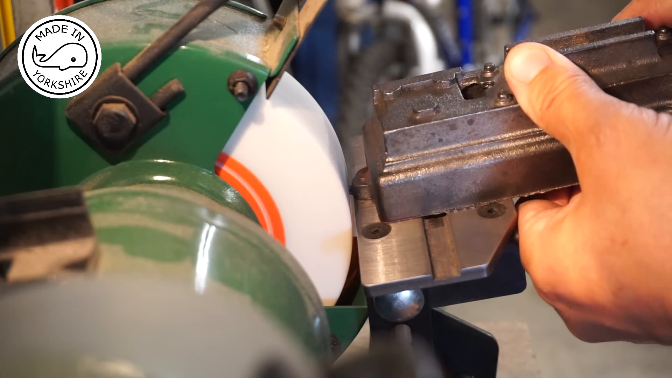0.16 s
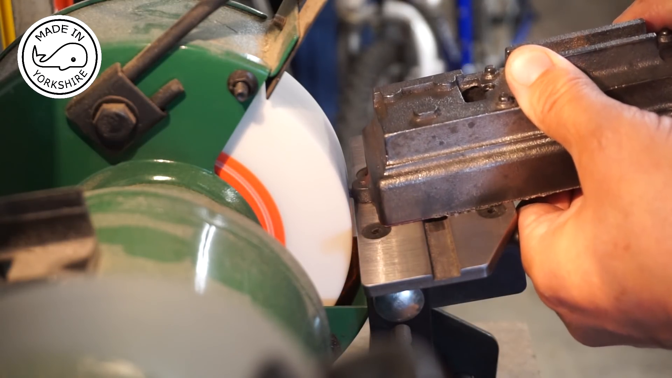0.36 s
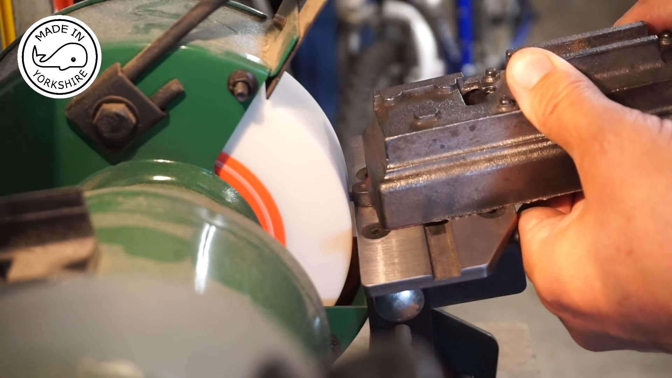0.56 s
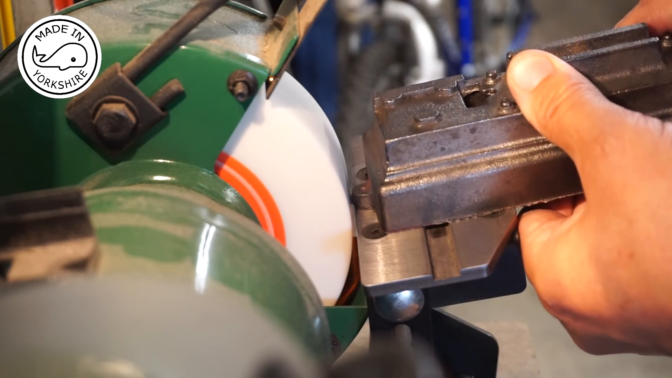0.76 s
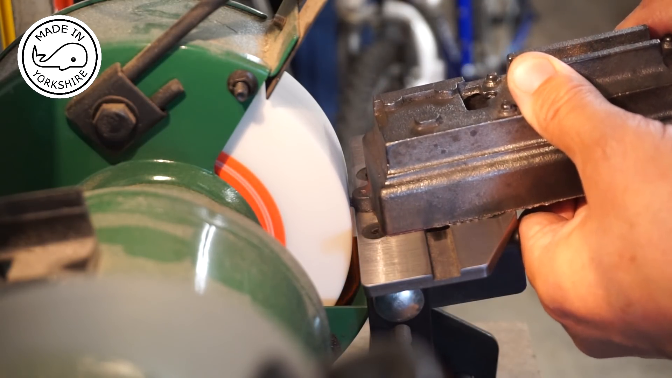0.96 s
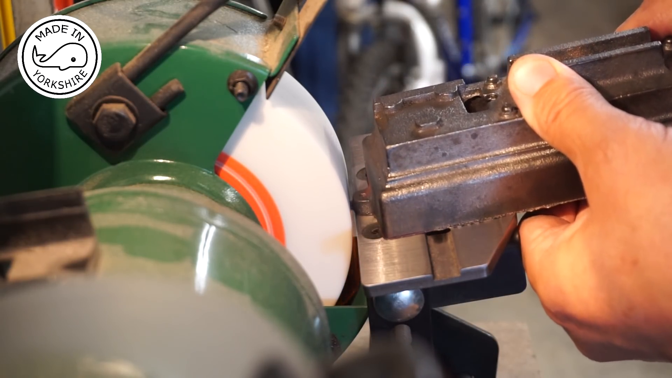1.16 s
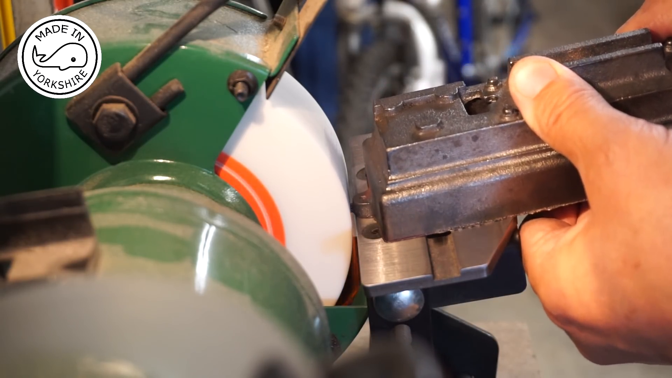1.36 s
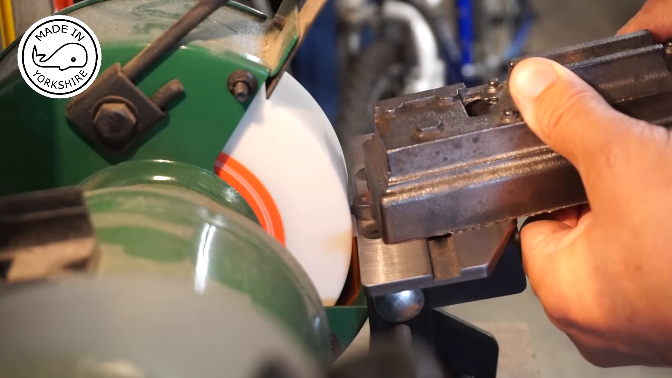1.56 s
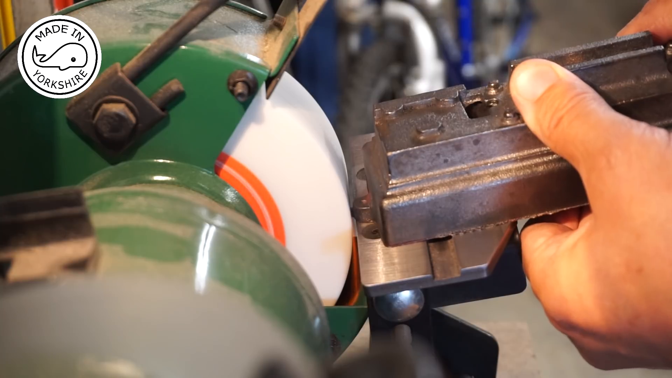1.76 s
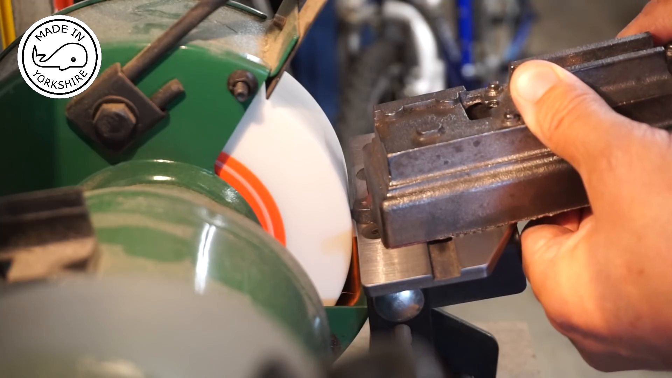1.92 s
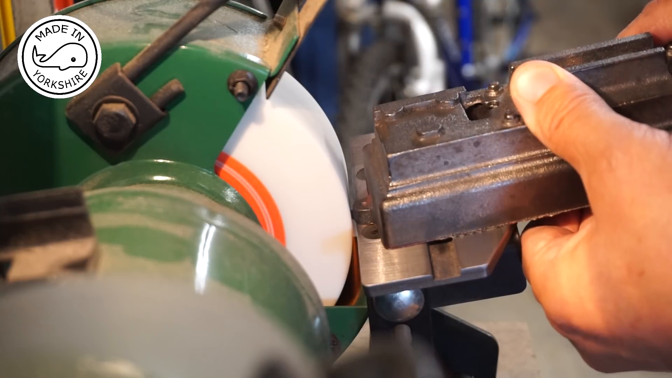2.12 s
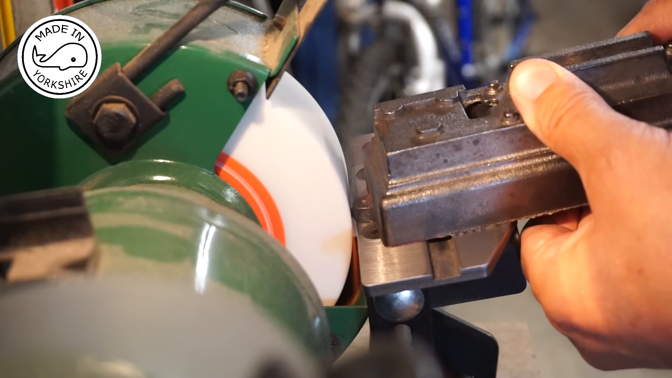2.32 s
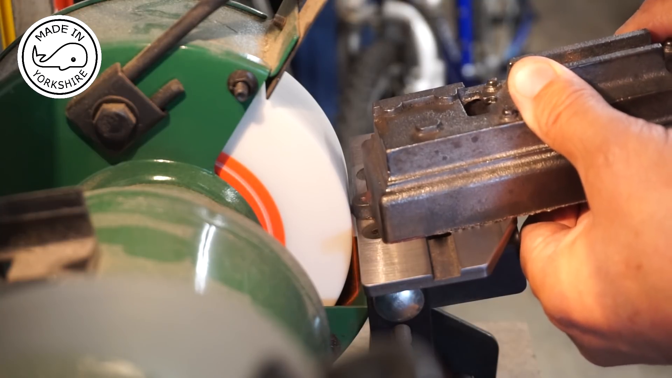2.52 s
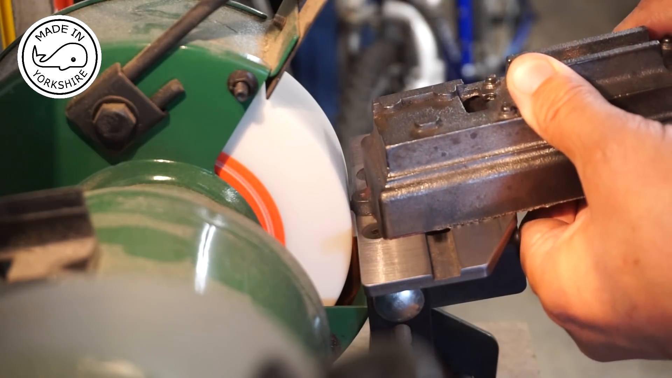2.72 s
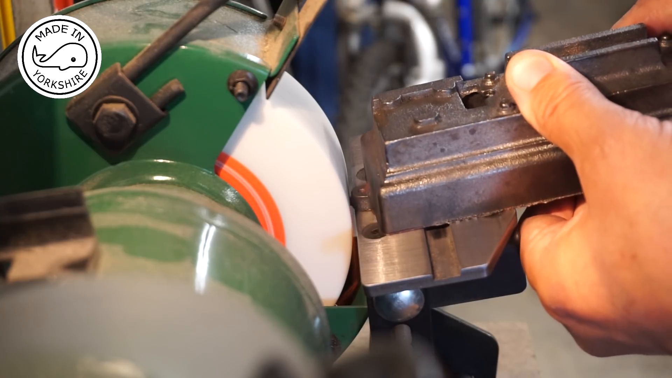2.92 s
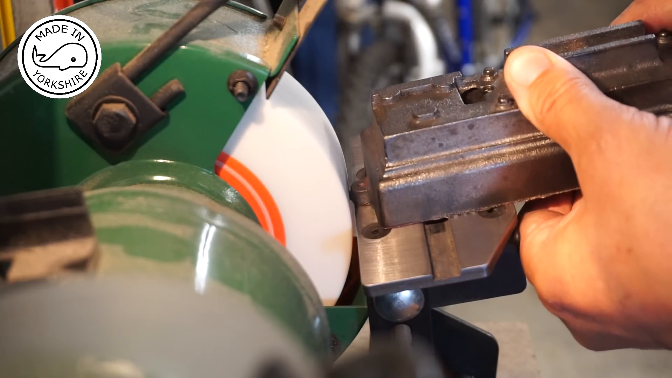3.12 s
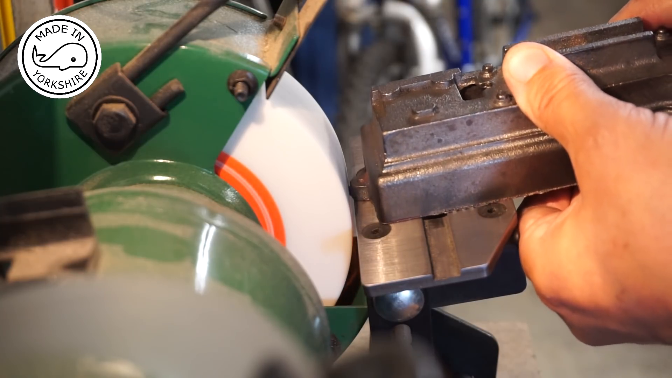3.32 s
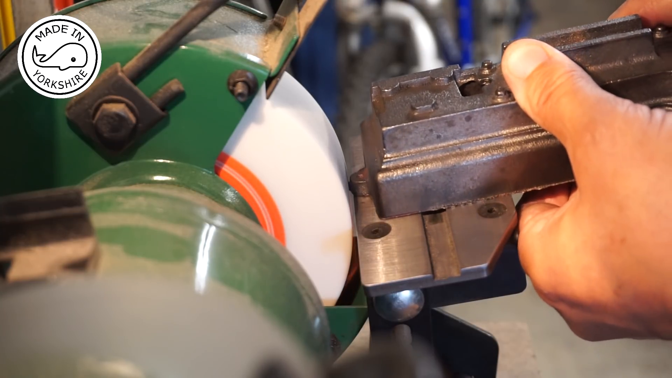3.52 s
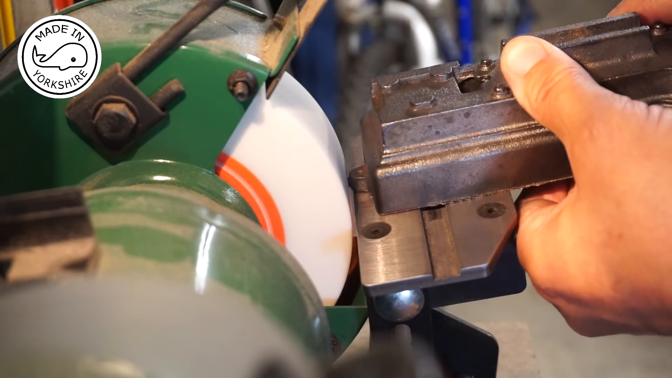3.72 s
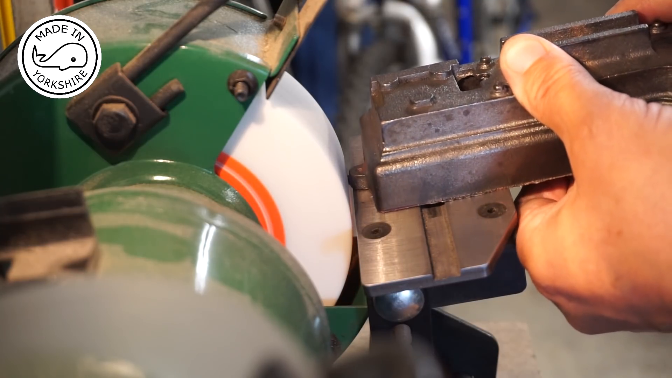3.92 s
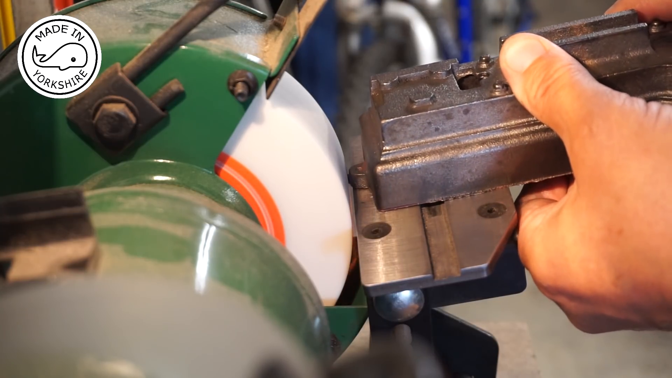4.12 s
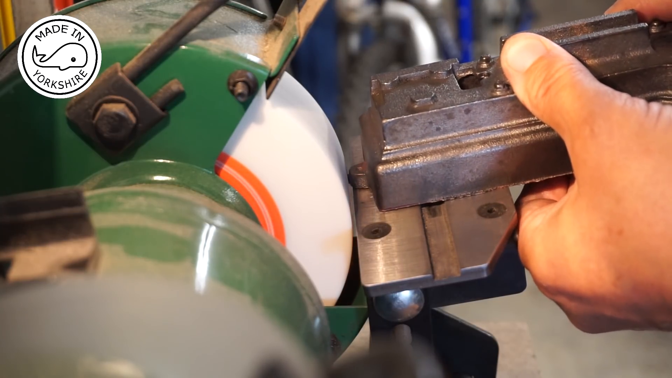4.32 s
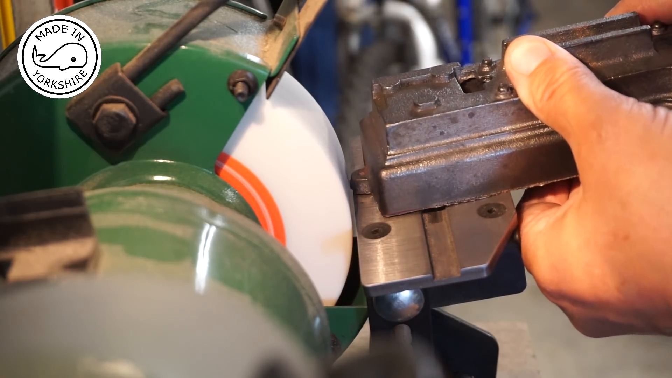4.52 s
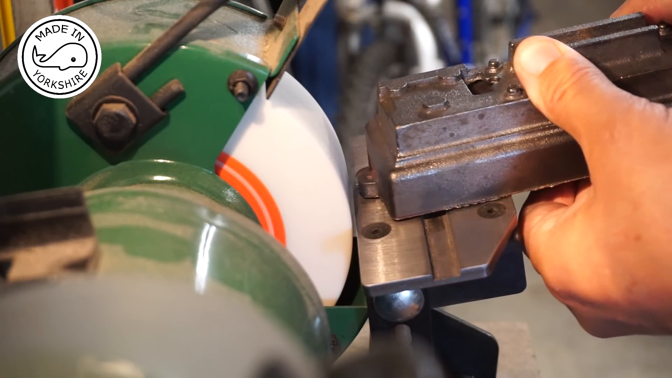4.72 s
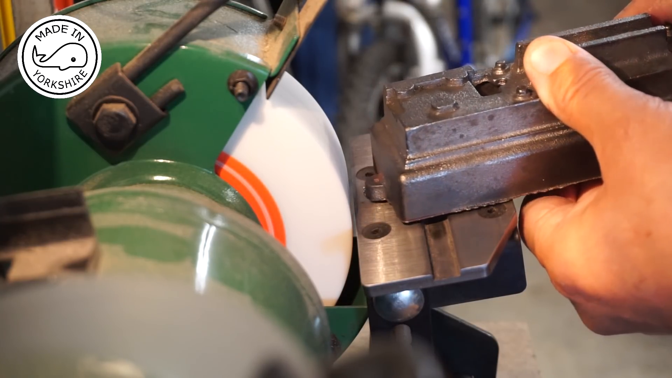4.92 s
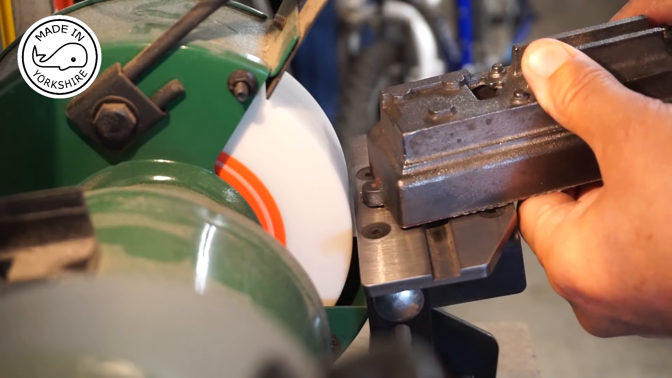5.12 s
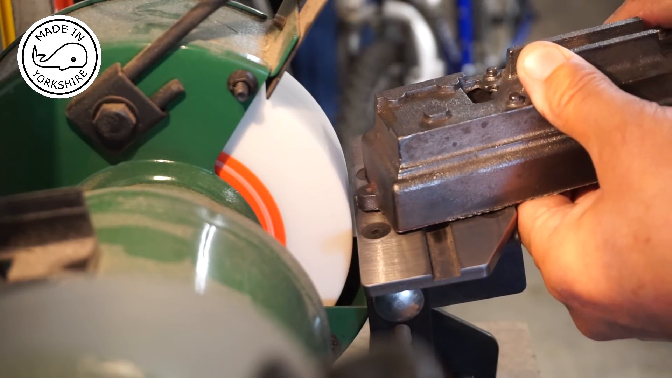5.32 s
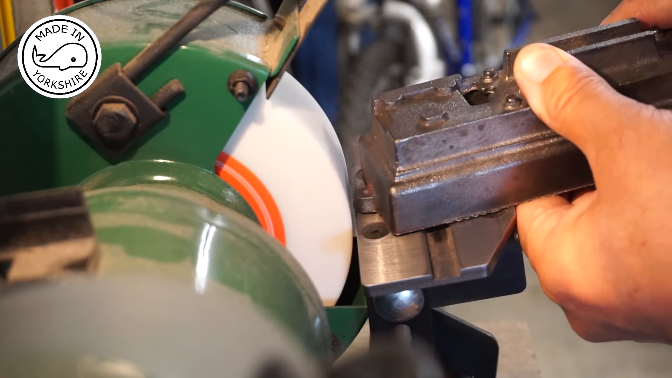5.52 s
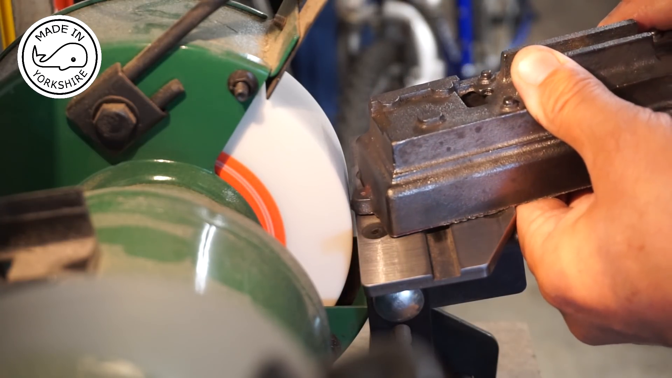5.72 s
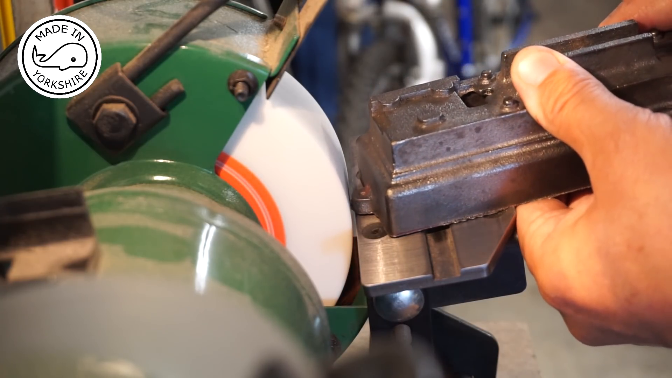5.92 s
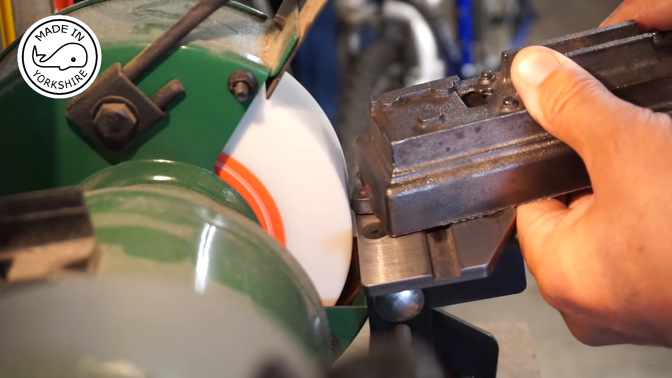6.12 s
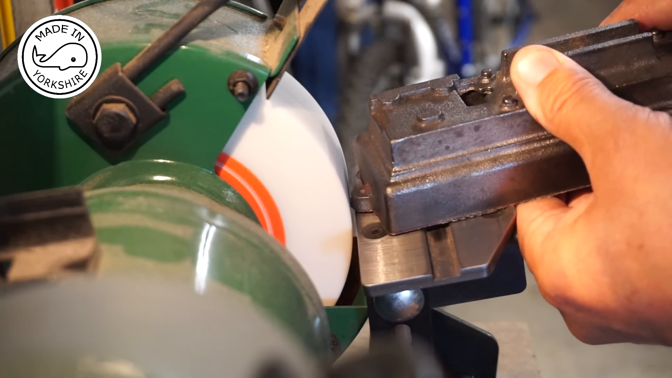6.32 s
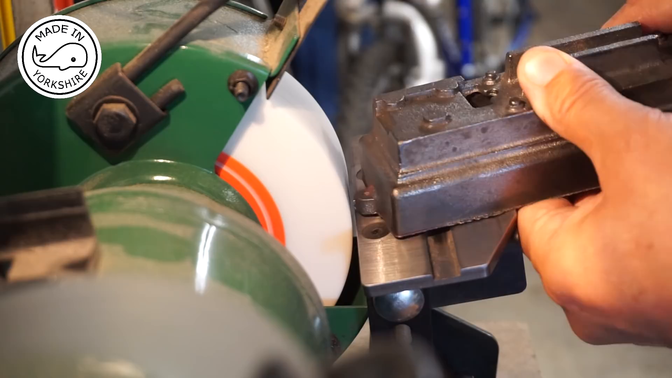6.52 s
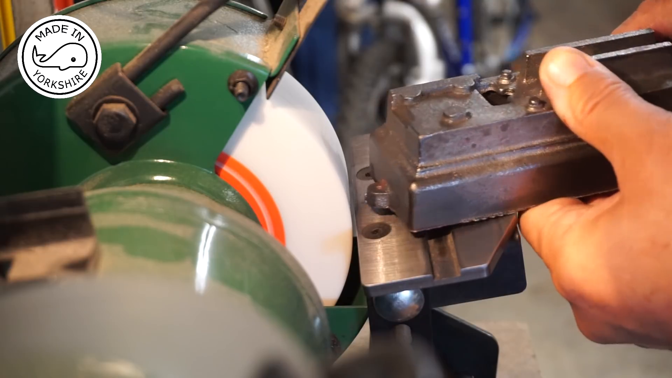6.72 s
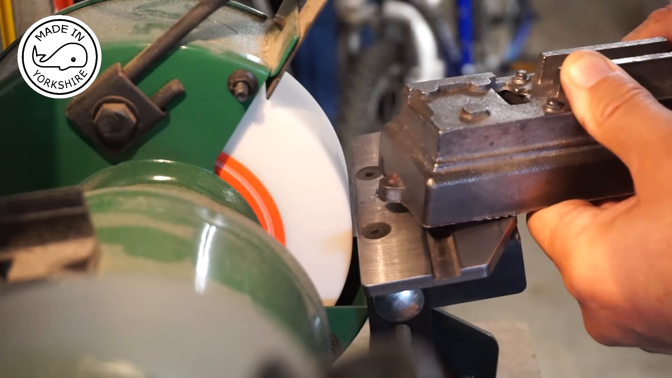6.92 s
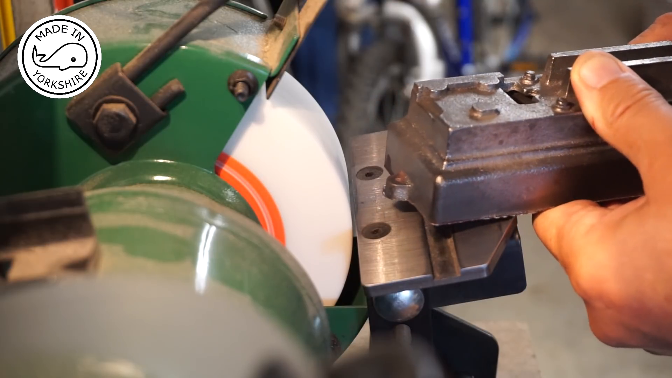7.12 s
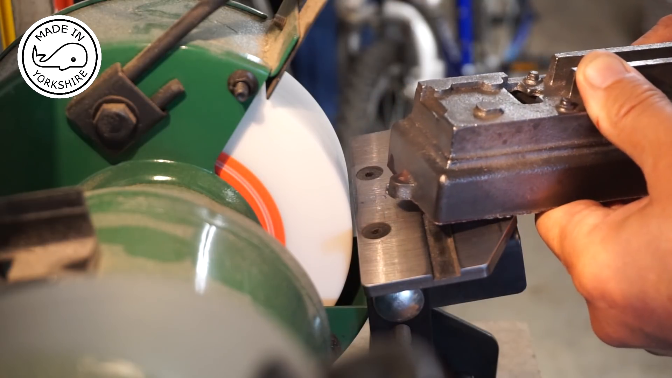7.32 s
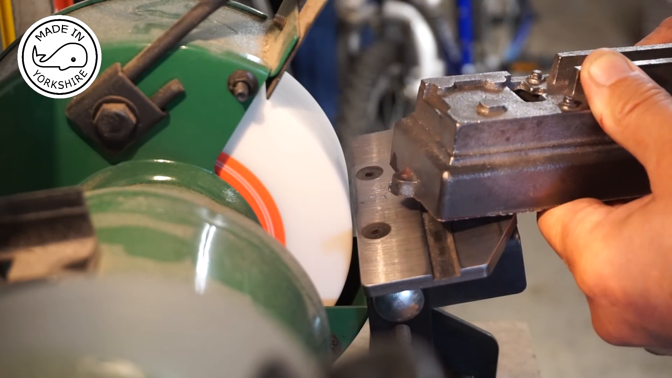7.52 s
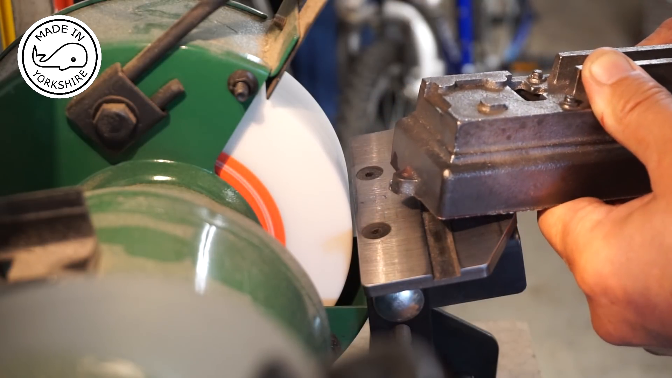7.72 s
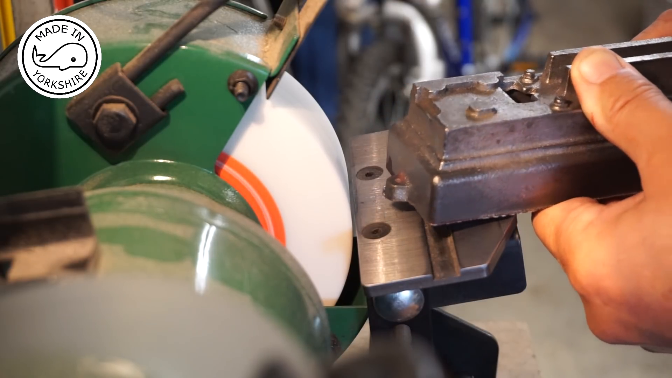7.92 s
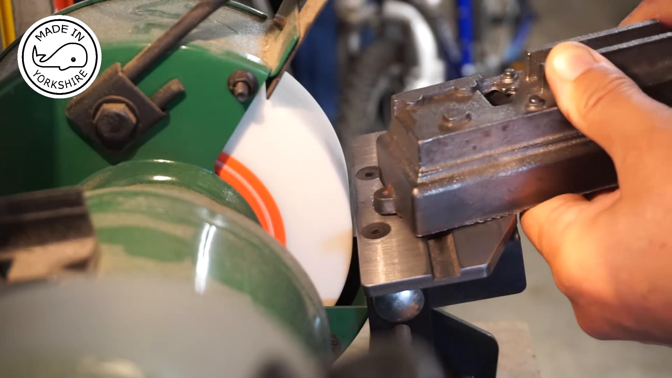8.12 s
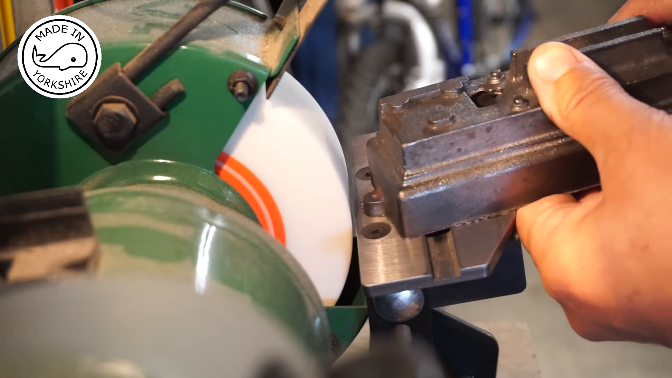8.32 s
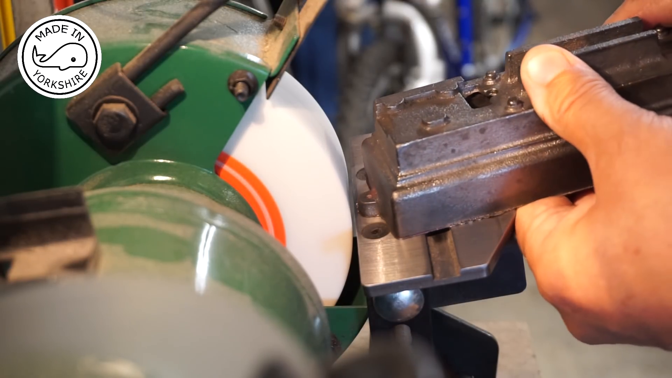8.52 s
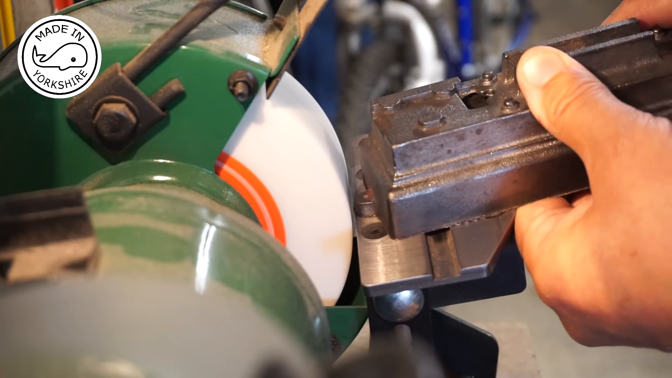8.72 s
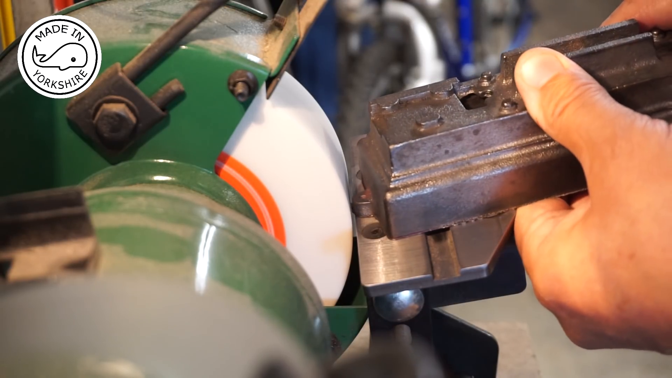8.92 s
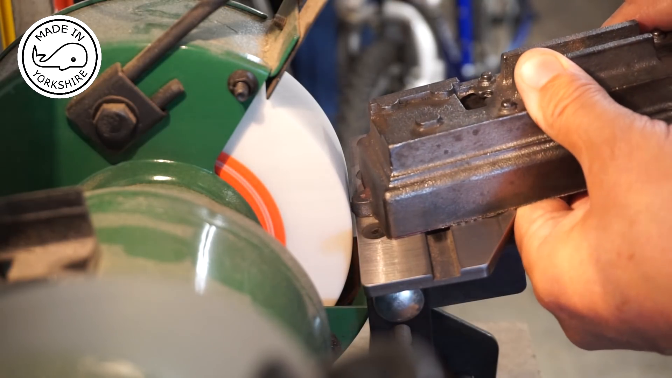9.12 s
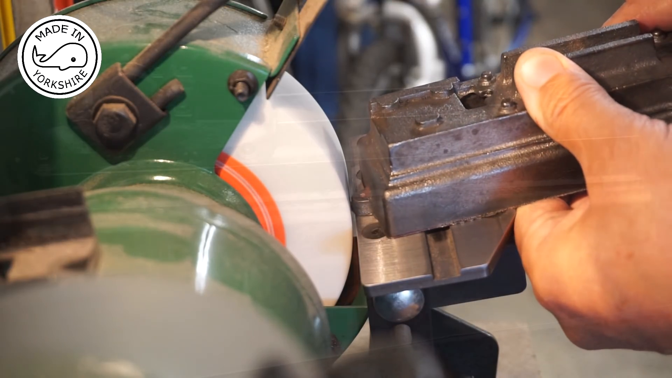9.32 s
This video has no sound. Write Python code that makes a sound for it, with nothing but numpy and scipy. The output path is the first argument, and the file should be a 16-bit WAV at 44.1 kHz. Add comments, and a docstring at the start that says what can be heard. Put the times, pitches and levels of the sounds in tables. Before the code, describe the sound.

From 0 to 4.3 seconds a steel casting is held against a bench grinder's wheel: a loud, dense, bright metallic hiss with many high ringing tones, over a hollow mid-low roar from the guard. It flutters fast, about fifty times a second, and wavers with hand pressure; faint dull thuds come through the bench. At 4.3 the casting stutters off in rapid skips. The much quieter free wheel hums, with airy rush and bearing whirr, while the casting buzzes on the tool rest until 5.25. Small knocks at 5.6 lead into a second, rougher stroke from 5.7 to 6.4. Then come scraping buzzes and light knocks, the loudest knock at 8.1 starting a strong buzz, with another short one near 8.45. At 9.0 a third bright, throbbing stroke bites in and continues to the end at about 9.5. Close stereo, short room echo.

```python
"""A steel casting is already being pressed on a bench grinder's wheel in a small workshop: grit rings the
casting and roars in the guard, throbbing with each turn, while the free wheel hums underneath and low thuds
come through the bench. At 4.3 s the casting skips off the wheel, then buzzes on the tool rest, hopping once a
turn. A short second stroke comes at 5.7 s, then more buzzing and knocks on the rest, the loudest at 8.1 s. A
third stroke starts at 9.0 s and is still going at the end; a short echo follows throughout."""
import sys
import numpy as np
from scipy import signal
from scipy.fft import rfft, irfft, next_fast_len
from scipy.io import wavfile
from scipy.ndimage import uniform_filter1d, map_coordinates

SR = 44100
rng = np.random.default_rng(int(sys.argv[2]) if len(sys.argv) > 2 else 0)


def transcribe(signal):
    """Save signal, clipped to [-1, 1], as a 16-bit WAV file at the path in sys.argv[1]."""
    frames = np.atleast_2d(signal).T
    limited = np.clip(frames, -1, 1)
    pcm = np.round(limited * 32767).astype(np.int16)
    wavfile.write(sys.argv[1], SR, pcm)


N = 412756  # length in samples


def amp(db):
    """Decibels become a plain gain."""
    return 10 ** (np.asarray(db) / 20)


def unit(x):
    """Scale a signal to an average (RMS) strength of 1."""
    return x / np.sqrt(np.mean(x ** 2) + 1e-20)


def along(points, hz):
    """Read a curve of (f/Hz, value) points on a log frequency axis."""
    f, value = np.transpose(points)
    return np.interp(np.log(hz + 1), np.log(f + 1), value)


def curves(rows):
    """One value per sample for each column after the time."""
    s, *columns = np.transpose(rows)
    return [np.interp(np.arange(N) / SR, s, column) for column in columns]


def wobble(rate):
    """A smooth random curve through rate random points a second."""
    knots = rng.standard_normal(int(N * rate / SR) + 4)
    fine = np.arange(0, len(knots) - 1, 1 / 10)
    return np.interp(np.arange(N) * rate / SR, fine, map_coordinates(knots, [fine]))


def filtered(x, response):
    """Multiply the spectrum of x by a response that depends on frequency."""
    size = next_fast_len(N + SR // 2)
    return irfft(rfft(x, size) * response(np.fft.rfftfreq(size, 1 / SR)), size)[..., :N]


def ring(x, modes, sharp=0.92, core=0.0, size=8192):
    """Shake a body that rings at its modes; core is the strength of each mode's long-ringing centre."""
    hz = np.fft.rfftfreq(size, 1 / SR)

    def peak(offset):
        return 1 / (1 + offset ** 2) ** 2

    power = 0
    for f, width, db in modes:
        offset = sharp * (hz - f) / width
        power = power + amp(db) ** 2 * (peak(offset) + core * peak(5 * offset))
    power = power * (1 - 1 / (1 + (hz / 200) ** 7))  # low cut: keep the bass out below about 200 Hz
    # fold the cepstrum so that the body answers only after it is struck
    cepstrum = irfft(np.log(power + 1e-12) / 2)
    cepstrum[1:size // 2] *= 2
    cepstrum[size // 2 + 1:] = 0
    answer = irfft(np.exp(rfft(cepstrum)))
    return signal.fftconvolve(x, answer / np.linalg.norm(answer))[:N]


def surface(turns, life, count):
    """A pattern of count bumps round the wheel that recurs each turn and wears away over life turns."""
    keep = np.exp(-1 / life)
    fresh = rng.standard_normal((int(turns[-1]) + 2, count))
    fresh[0] /= np.sqrt(1 - keep ** 2)  # the first turn is already fully rough
    worn = signal.lfilter([1], [1, -keep], fresh, axis=0)
    return unit(map_coordinates(worn.ravel(), [turns * count]))


def bursts(events, t60):
    """A short noisy scrape at each event, falling by 60 dB in t60 seconds."""
    out, t = np.zeros(N + SR), np.arange(SR // 4) / SR
    for s, db in events:
        out[round(s * SR):][:len(t)] += amp(db - 60 * t / t60) * rng.standard_normal(len(t))
    return out[:N]


def once_a_turn(turns, fade, bed_db):
    """Envelope that jumps up each turn and fades within a share of the turn, over a steady bed."""
    return unit(np.exp(-(turns % 1) / fade) + amp(bed_db))


def shaft_tones(turns, orders, waver_db, drift):
    """Tones at multiples of the shaft speed, wavering in level (dB) and drifting in phase (radians)."""
    total = 0
    for multiple, db in orders:
        level = amp(db + waver_db * wobble(5))
        phase = 2 * np.pi * (multiple * turns + rng.random()) + drift * wobble(7)
        total = total + level * np.sin(phase)
    return unit(total)


def spell(start, end, attack_s, release_s):
    """Gain that swells from start, holds, and dies away after end."""
    t = np.arange(N) / SR
    swell = 1 - np.exp(-np.maximum(t - start, 0) / attack_s)
    return swell * np.exp(-np.maximum(t - end, 0) / release_s)


# speed of the shaft, lower during the strokes: t/s, speed/(turns per second)
SHAFT_SPEED = [(0, 49.2), (1.3, 49.2), (2.2, 48.95), (3.4, 49.25), (4.25, 49.25), (4.55, 49.8),
               (5.7, 49.85), (6.25, 49.3), (6.6, 49.85), (9.0, 49.85), (9.36, 49.3)]


def shaft_turns():
    """Add up the shaft speed to count the turns made so far."""
    return np.cumsum(curves(SHAFT_SPEED)[0]) / SR


# strokes on the wheel, the first already under way: start t/s, end t/s, casting ring level/dB,
# guard roar level/dB, throb depth/dB, easing off before the end/s (levels before the final trims)
STROKES = [(-1, 4.33, -23.7, -30.1, 1.3, .03), (5.705, 6.425, -24.5, -30.6, 5, .07),
           (9.008, 9.5, -22.8, -27.2, 5, .04)]
# the casting's ring in the first stroke; only its ups and downs about the mean count: t/s, level/dB
BITE = [(0.0, -21), (0.05, -24), (0.23, -23), (1.11, -24), (1.23, -22), (1.27, -26), (1.36, -22),
        (1.87, -25), (2.13, -21), (2.43, -24), (3.17, -23), (3.19, -25), (4.29, -22), (4.3, -24)]
# the hand's push in the first stroke, heard as the guard's roar, likewise: t/s, level/dB
PUSH = [(0.0, -30), (0.14, -35), (0.15, -30), (1.11, -31), (1.23, -35), (1.34, -28), (1.39, -37),
        (1.54, -29), (2.53, -27), (2.68, -34), (2.74, -27), (2.86, -32), (3.04, -28), (3.07, -33),
        (3.53, -33), (3.54, -29), (3.86, -34), (4.3, -32)]
SETTLE_S, FIRST_TOUCH_DB = .16, -19  # the roar builds from a light touch as the hand leans in
SHARP_DB, SHARP_S = 1, .1  # the fresh edge rings louder until it is blunted
LIFT_S = .01  # the casting leaves the wheel


def hand():
    """Ring gain, roar gain and throb depth: the ring starts at first touch, the rest as the hand leans in."""
    t = np.arange(N) / SR
    ringing = roaring = throb = 0
    for start, end, ring_db, roar_db, throb_db, ease_s in STROKES:
        age = np.maximum(t - start, 0)
        touch = spell(start, end, attack_s=.001, release_s=LIFT_S)
        unsettled = np.exp(-age / SETTLE_S)
        lean = np.clip((end + LIFT_S - t) / ease_s, .1, 1)
        ringing = ringing + touch * amp(ring_db + SHARP_DB * np.exp(-age / SHARP_S))
        roaring = roaring + touch * lean * amp(roar_db + FIRST_TOUCH_DB * unsettled)
        throb = throb + touch * throb_db * (1 - .4 * unsettled)
    # in the first stroke the hand's effort wanders about its mean
    first = t < STROKES[0][1]

    def wander(level_db):
        return amp((level_db - level_db[first].mean()) * first)

    return ringing * wander(curves(BITE)[0]), roaring * wander(curves(PUSH)[0]), throb


def wheel_pressure(turns, throb_db):
    """Two high spots of the wheel and its worn bumps vary the pressure on the casting."""
    high_spots = np.exp(-((2 * turns + .55) % 1) / .7)
    # the cosine makes the two spots unequal
    high_spots = unit(high_spots - high_spots.mean()) + .3 * np.cos(2 * np.pi * (turns + .1))
    pressure_db = throb_db * (0.8 * high_spots + 0.34 * surface(turns, life=6.8, count=9))
    pressure = amp(pressure_db + 1.25 * wobble(45))
    # the hand holds the mean force over 60 ms nearly steady
    mean_force = np.sqrt(uniform_filter1d(pressure ** 2, size=2646))
    return pressure * amp(0.75 * wobble(16)) / mean_force


# modes of the casting: f/Hz, width/Hz, then level/dB when ground on its face, corner and edge
CASTING_MODES = [(1690, 150, -28, -11, -15), (2340, 300, -16, -16.5, -20), (2760, 135, -9, -8.5, -27),
                 (3068, 420, -14, -15, -13.5), (4164, 990, -22, -22.5, -24.5),
                 (4840, 300, -17.5, -16.5, -15.5), (5235, 145, -20.5, -9, -7.5),
                 (5668, 280, -6.5, -9, -10.5), (6170, 150, -8, -13, -11), (6580, 310, -16.5, -20.5, -13.5),
                 (6880, 230, -5.5, -14, 0), (7570, 290, -5.5, -8, -4.5), (8230, 260, -22, -8.5, -10),
                 (8790, 330, -2, -6.5, -15.5), (9540, 330, -8.5, -20.5, -12), (10320, 960, -11.5, -21, -33),
                 (10700, 140, -4, -19, -13), (11370, 360, -1.5, -6.5, -9), (12030, 165, -3.3, -18, -6.5),
                 (12540, 115, -8.5, -9.5, -10), (13000, 2200, -15.5, -21.5, -12.5),
                 (14220, 170, -4, -9, -1.5), (15050, 200, -6, -11, -13), (15600, 280, -8, -16, -17)]
CASTING_PLACES = 3


def casting_ring(bite, place):
    """The bite rings the casting; the place of contact decides how strongly each mode is driven."""
    total = 0
    for k in range(CASTING_PLACES):
        share = np.sqrt(np.clip(1 - abs(place - k), 0, 1))
        modes = [(f, width, levels[k]) for f, width, *levels in CASTING_MODES]
        total = total + ring(bite * share, modes, sharp=1.17, core=2.2)
    return total


# modes of the wheel guard: f/Hz, width/Hz, level/dB
GUARD_MODES = [(327, 32, -16.5), (548.5, 57.4, 3), (765.5, 64, -0.3), (913, 99, -5.5), (1194, 143, -6),
               (1407, 170, -9), (1662, 78, -6.2), (1840, 270, -14.3)]
# steady drone from the ripples of the wheel face: multiple of the shaft speed, level/dB
RIPPLES = [(5, -23.5), (7, -11), (8, -17), (9, -13), (11, 0), (12, 0), (14, -5.5), (16, 0), (18, -4),
           (19, -10), (24, -12.5), (26, -15)]


def guard_roar(turns, pressure, grit):
    """The wheel's coarse relief shakes the guard at multiples of the shaft speed; grit adds a rougher roar."""
    patches = amp(2.5 * surface(turns, life=7.2, count=20))
    relief = pressure * unit(surface(turns, life=6.5, count=160) * patches)
    shake = unit(ring(relief, GUARD_MODES, sharp=1.07)) + 1.3 * unit(ring(grit, GUARD_MODES, sharp=1.18))
    drone = shaft_tones(turns, RIPPLES, waver_db=2.0, drift=0.73)
    return unit((shake + amp(-4.5) * drone) * amp(wobble(16)))


def machine_shudder():
    """The whole machine shudders: low noise that swells and sinks unevenly."""
    def low(hz):
        return (hz + 80) / (hz + 200) / (1 + (hz / 200) ** 4)

    return unit(filtered(rng.standard_normal(N), low) * amp(5.2 * wobble(23)))


# where the casting meets the wheel: t/s, place (0 = flat face, 1 = corner, 2 = edge)
PLACE = [(3.2, .15), (3.8, .98), (4.3, 1.2), (5.7, 2), (6.1, 1.88), (9, 2), (9.36, 1.88)]
# single skips of the casting on the wheel: t/s, level/dB (relative; trimmed where they are mixed)
SKIPS = [(4.3173, -12), (4.326, -7.5), (4.3415, -8), (4.354, -7), (4.3702, -7.5), (4.4099, -9),
         (4.4287, -9.5), (4.4518, -11), (5.704, -14), (6.4232, -10), (6.4488, -8.5), (9.0049, -5)]


def grinding(turns):
    """Grit tears at the casting, ringing it and shaking the guard and the machine."""
    ring_gain, roar_gain, throb_db = hand()
    place = np.clip(curves(PLACE)[0], 0, 2)
    pressure = wheel_pressure(turns, throb_db)
    # single grains bite with very uneven force
    grit = pressure * unit(rng.standard_normal(N) * amp(5.7 * np.tanh(wobble(1100))))
    skips = bursts(SKIPS, t60=.03)
    bite = amp(-2.03) * ring_gain * grit + amp(-11.5) * skips
    roar = amp(-0.26) * roar_gain * guard_roar(turns, pressure, grit)
    # an edge digs in and makes the machine shudder
    digging = np.clip(place - 1, .01, 1)
    rumble = amp(-26) * roar_gain * machine_shudder() * digging
    return casting_ring(bite, place) + roar + rumble + amp(-30) * ring(skips, GUARD_MODES)


# free-running grinder: t/s, hum and air level/dB, bearing whirr level/dB (hum and air trimmed below)
IDLE = [(4.5, -54.5, -60.5), (5.6, -49.5, -56.5), (6.7, -52, -59.5), (7.1, -50, -55.5), (7.9, -47.5, -56),
        (8.4, -43.5, -58), (8.75, -45.5, -55.5), (9.0, -43.5, -50)]
# hum of the free wheel: multiple of the shaft speed, level/dB
HUM = [(3, -23), (4, -21.5), (5, -14), (6, -5), (7, -7.5), (8, -3.5), (9, -3.5), (10, 3), (13, -22),
       (15, -1.5), (18, -3.5), (19, -7.5), (20, -4), (24, -8), (27, -4), (29, -5.5), (41, -6), (56, -6.5)]
# tone colour of the rushing air: f/Hz, level/dB
AIR = [(18, -62), (30, -63), (214, -36), (294, -5.5), (424, -8.5), (496, 3), (537, 0.5), (755, -2.3),
       (1090, -5.5), (2870, -9.5), (3110, -8.5), (4370, -15), (7010, -20.5), (11800, -21.5), (15800, -21)]
# whirr of the bearings: f/Hz, width/Hz, level/dB
BEARING_MODES = [(2820, 290, 2), (4400, 150, 5.5), (8000, 4700, -13.5), (11640, 500, -2),
                 (14200, 2000, -13)]


def free_wheel(turns):
    """Hum at multiples of the shaft speed, rushing air, and bearings that whirr once a turn."""
    idle_db, whirr_db = curves(IDLE)
    hum = shaft_tones(turns, HUM, waver_db=2.6, drift=.3)
    air = unit(filtered(rng.standard_normal(N), lambda hz: amp(along(AIR, hz))))
    air *= once_a_turn(turns, fade=0.3, bed_db=2)
    rolling = rng.standard_normal(N) * once_a_turn(turns, fade=0.12, bed_db=-22)
    whirr = ring(rolling, BEARING_MODES)
    return amp(idle_db) * (amp(-2.6) * hum + amp(0.7) * air) + amp(whirr_db) * whirr


# dull thuds through the bench: t/s, peak level/dB
THUDS = [(.047, -48), (.495, -45), (1.85, -45), (2.435, -53), (3.005, -49), (3.605, -50), (3.745, -54),
         (4.33, -53)]


def bench():
    """Dull thuds through the bench: one low, quickly damped 90 Hz swing each."""
    out, t = np.zeros(N + SR), np.arange(SR // 4) / SR
    swing = np.sin(2 * np.pi * 90 * t) * amp(-60 * t / 0.031) * (1 - np.exp(-t / .003))
    for s, db in THUDS:
        out[round(s * SR):][:len(t)] += amp(db) * swing / swing.max()
    return out[:N]


# spells of the casting trembling on the tool rest: start t/s, end t/s, level/dB, swell/s,
# dying away/s, rubbing relative to hopping
TREMBLES = [(4.49, 4.9, -43.2, .05, .025, .02), (4.98, 5.005, -41, .005, .012, .05),
            (5.106, 5.245, -37.8, .02, .115, .02), (6.52, 6.56, -43.2, .01, .04, .3),
            (6.715, 7.02, -37.5, .11, .02, .4), (7.143, 7.262, -37.8, .016, .07, .4),
            (7.6, 7.63, -46, .01, .02, .4), (7.935, 7.975, -36.5, .012, .075, .35),
            (8.092, 8.325, -34.2, .025, .022, .35), (8.448, 8.478, -34.8, .015, .012, .35)]
# casting bumped and shifted on the rest: t/s, level/dB (trimmed where they are mixed)
KNOCKS = [(4.637, -41), (5.624, -38), (5.642, -35), (6.608, -31), (6.647, -36), (6.867, -33), (7.469, -36),
          (7.552, -34), (7.62, -47), (8.072, -19)]
# modes of the tool rest: f/Hz, width/Hz, level/dB
REST_MODES = [(1920, 290, -7.5), (2407, 160, 0.5), (3143, 190, 4), (3665, 360, -0.5), (4680, 2350, -11),
              (6200, 260, -1.3), (6820, 900, -7.5), (8280, 160, -7), (9360, 426, -11), (10000, 2500, -13),
              (12642, 303, -25), (15013, 283, -17)]
# what dragging over the rest rings: f/Hz, width/Hz, level/dB
SCRAPE_MODES = [(3250, 200, -3), (10200, 1800, 0), (12100, 450, 0)]
# when dragged, each hop lands a second time: strength per unit of rubbing, delay in turns
REBOUND, REBOUND_TURNS = 1.1, .2


def tool_rest(turns):
    """Off the wheel, the casting hops on the shaking rest once a turn and is bumped about."""
    gain = drag = 0
    for start, end, db, swell_s, dying_s, rub in TREMBLES:
        level = amp(db) * spell(start, end, swell_s, dying_s)
        gain = gain + level
        drag = drag + level * rub
    drag = drag / (gain + 1e-12)  # share of rubbing at each moment
    force = amp(wobble(40)) * rng.standard_normal(N)
    # the sharp landing rings the high modes, the scuffing after it the low ones and the guard
    hop = turns + .63
    first_landing = once_a_turn(hop, fade=.11, bed_db=-28)
    second_landing = once_a_turn(hop - REBOUND_TURNS, fade=.11, bed_db=-28)
    landing = force * unit(first_landing + REBOUND * drag * second_landing)
    scuffing = force * once_a_turn(hop, fade=0.2, bed_db=-13)
    # dragged over the rest, the casting rubs between its hops
    rubbing = drag * rng.standard_normal(N)
    landing, scuffing = unit(landing + rubbing), unit(scuffing + rubbing)
    high_modes = [mode for mode in REST_MODES if mode[0] > 5000]
    low_modes = [mode for mode in REST_MODES if mode[0] <= 5000]
    high = ring(landing, high_modes, sharp=1.0, core=0.46)
    low = ring(scuffing, low_modes, sharp=1.6, core=0.58)
    # light contact is duller than firm contact
    firm = np.clip(gain / amp(-37.5), 0, 1) ** 2
    dull = filtered(high, lambda hz: 1 / (1 + (hz / 7700) ** 12))
    high = firm * high + (1 - firm) * dull
    buzz = amp(-3.3) * (1 - .8 * drag) * high + amp(-3.7) * low
    buzz = buzz + amp(-3) * drag * ring(landing, SCRAPE_MODES) + amp(-10) * ring(scuffing, GUARD_MODES)
    knocks = bursts(KNOCKS, t60=0.05)
    return gain * buzz + amp(-4) * ring(knocks, GUARD_MODES) + amp(-21) * ring(knocks, low_modes)


# how long the room rings on: f/Hz, time to fall by 60 dB/s
ROOM_DECAY = [(200, 0.1), (2000, 0.32), (14000, 0.19)]


def workshop(x):
    """The walls answer with a short tail, different at each microphone."""
    hz, t, noise = signal.stft(rng.standard_normal((2, SR // 2)), SR, nperseg=256)
    decay = amp(-60 * t / along(ROOM_DECAY, hz)[:, None])
    tail = signal.istft(noise * decay, SR, nperseg=256)[1]
    tail = np.pad(tail / np.linalg.norm(tail[0]), ((0, 0), (200, 0)))  # the tail starts 200 samples late
    wet = signal.fftconvolve(x[None], tail, axes=1)[:, :N]
    wet_db = [(200, -31), (600, -16.5), (3000, -2.5), (12000, -5)]  # f/Hz, level/dB
    return filtered(wet, lambda hz: amp(along(wet_db, hz)))


# stereo width, side against middle: f/Hz, level/dB
WIDTH = [(60, -39), (400, -28.5), (1000, -9.5), (2400, -15.5), (6000, -1), (15000, 2)]
# stereo balance, left against right: f/Hz, level/dB
BALANCE = [(400, -0.2), (1000, 0.9), (2400, -1), (6000, 0.2), (9000, -3.6), (15000, -3)]


def microphones(x):
    """Short waves reach the two capsules with different strength, leading at one or the other by turns."""
    def pair(hz):
        side = amp(along(WIDTH, hz))
        # the lead swaps sides as the frequency rises
        phase = np.arctan(side) * np.tanh(4 * np.sin(2 * np.pi * hz / 2650))
        half_db = along(BALANCE, hz) / 2
        left = amp(half_db) * np.exp(-1j * phase)
        right = amp(-half_db) * np.exp(1j * phase)
        return np.array([left, right]) * np.hypot(1, side)

    return filtered(x, pair)


def scene():
    """Add up the sources at the grinder, then the pair of microphones and the room's answer."""
    turns = shaft_turns()
    grinder = grinding(turns) + free_wheel(turns) + bench() + tool_rest(turns)
    return microphones(grinder) + workshop(grinder)


def record(dry):
    """Round off the highest peaks softly and keep nothing above the band limit."""
    ceiling, top_hz = .7, 15800
    rounded = dry / (1 + (dry / ceiling) ** 4) ** (1 / 4)
    return filtered(rounded, lambda hz: hz < top_hz)


dry = scene()
out = record(dry)
transcribe(out)
```